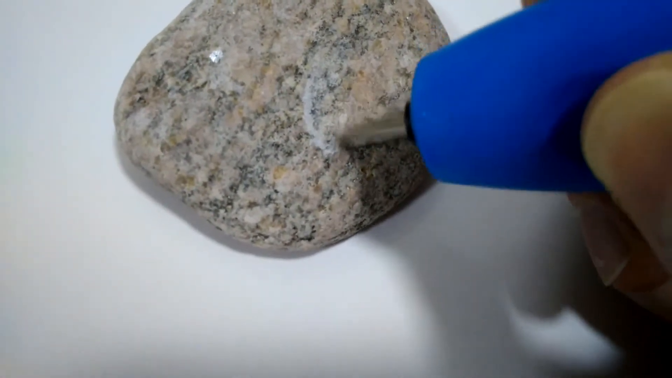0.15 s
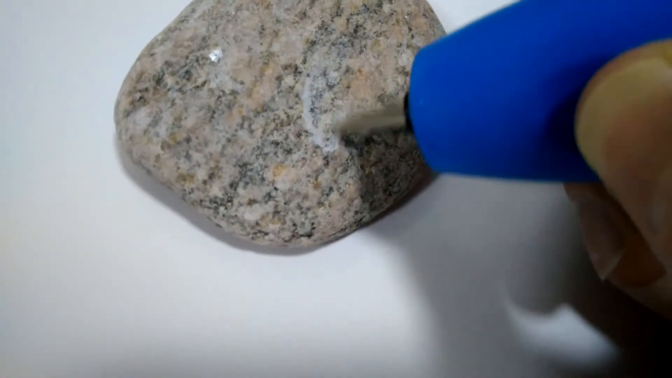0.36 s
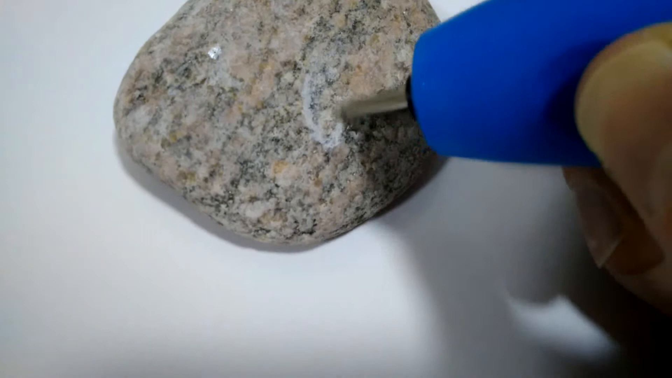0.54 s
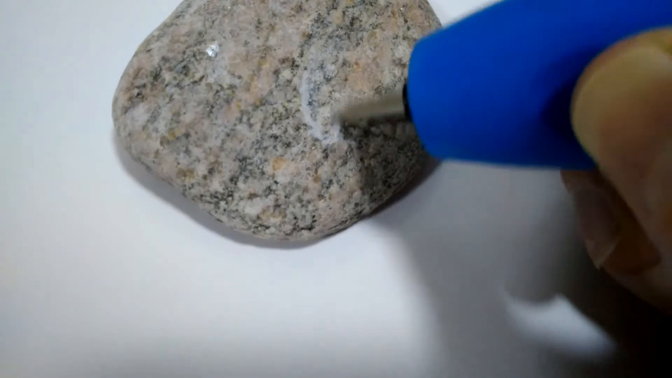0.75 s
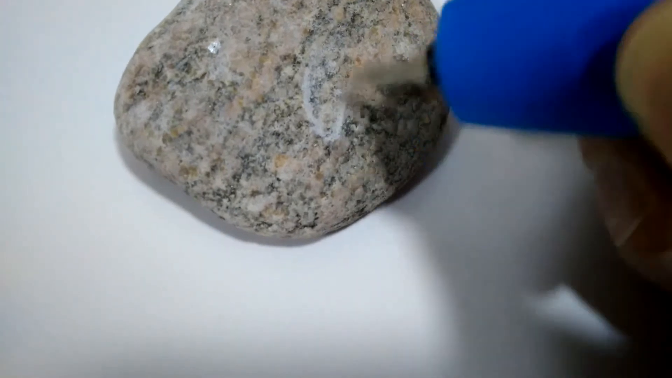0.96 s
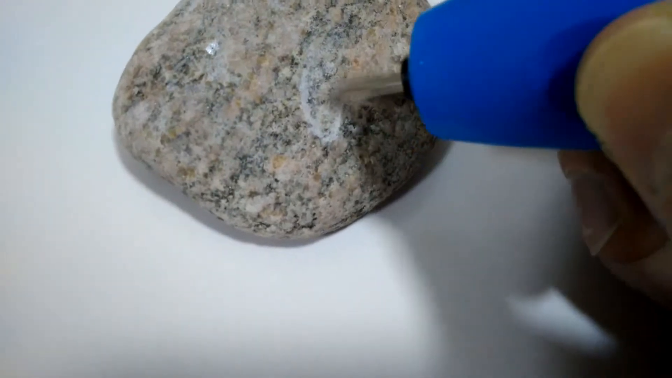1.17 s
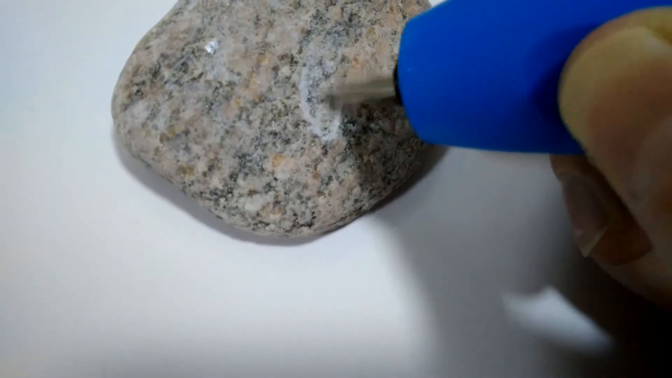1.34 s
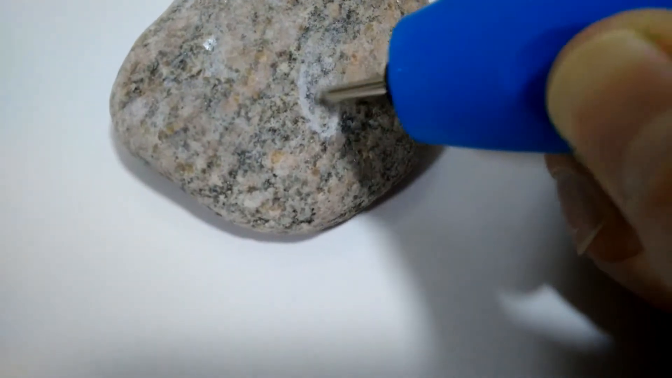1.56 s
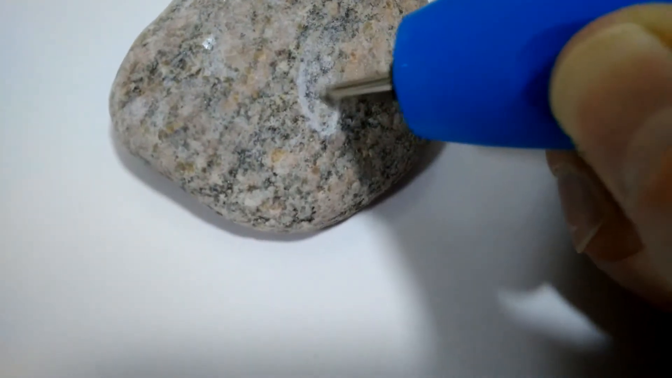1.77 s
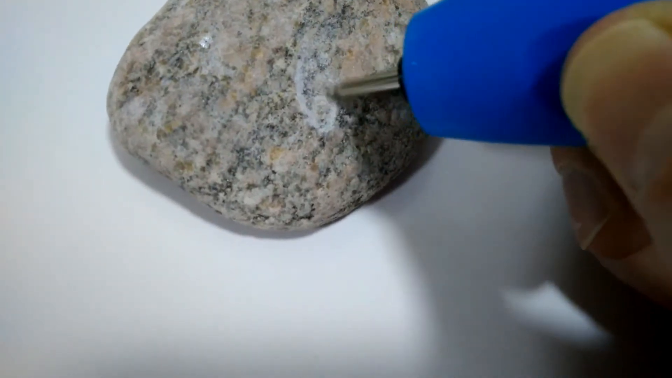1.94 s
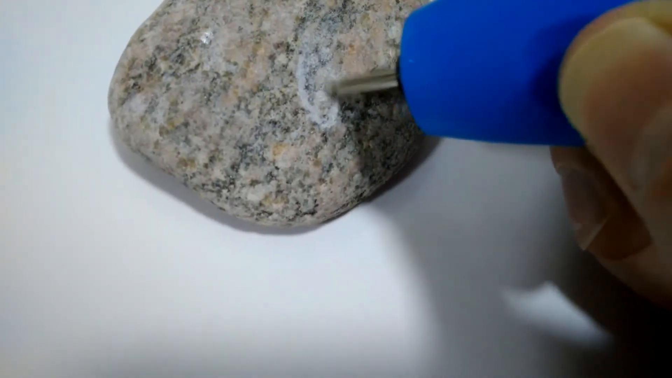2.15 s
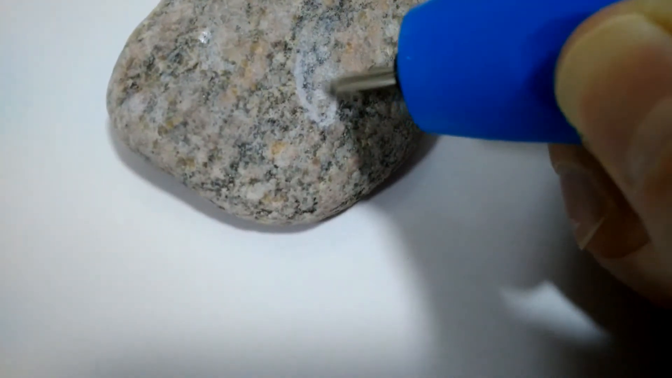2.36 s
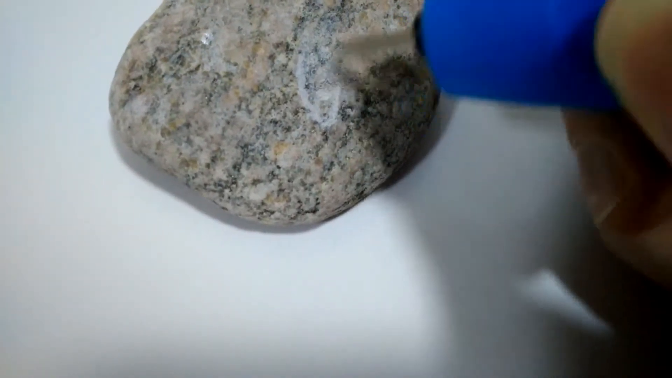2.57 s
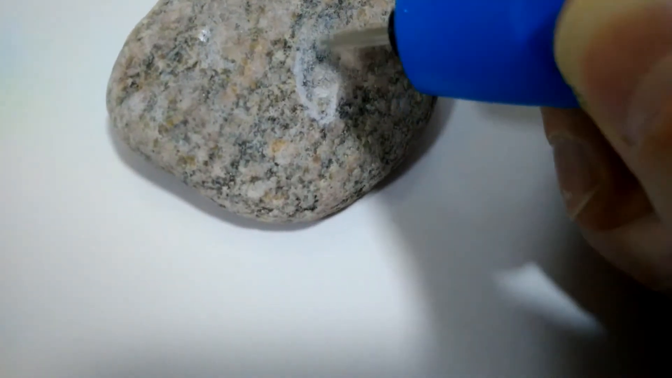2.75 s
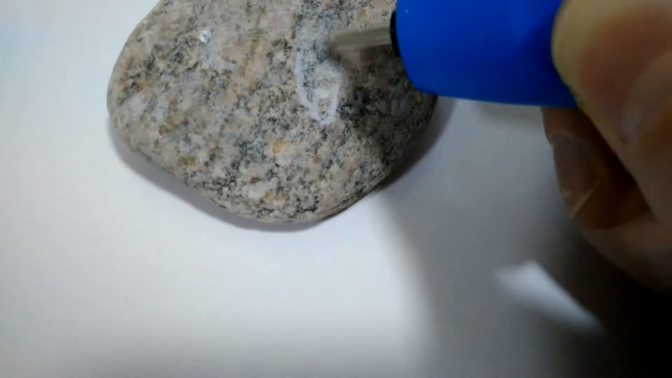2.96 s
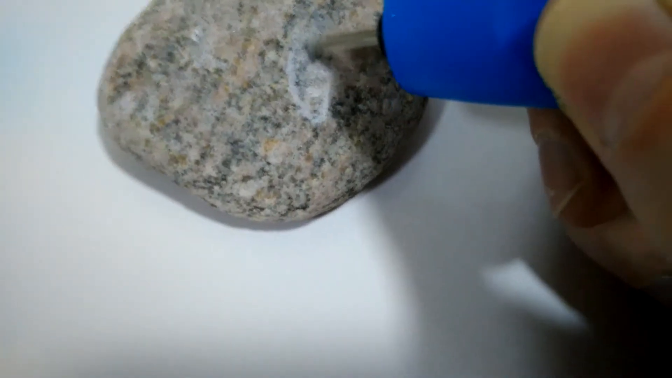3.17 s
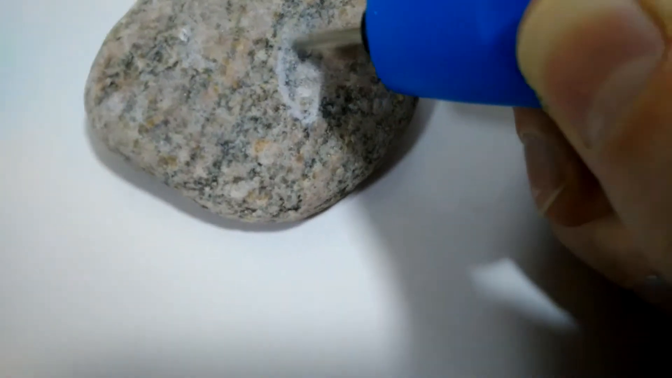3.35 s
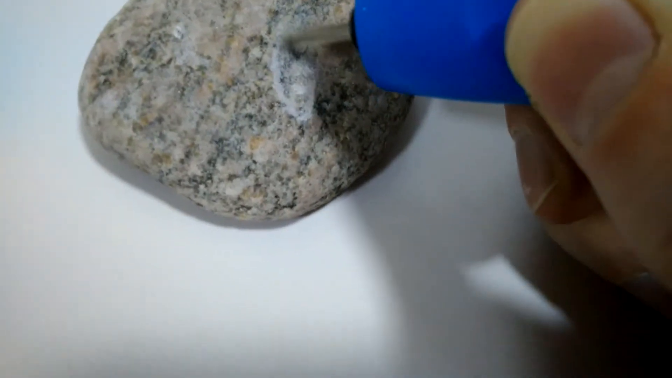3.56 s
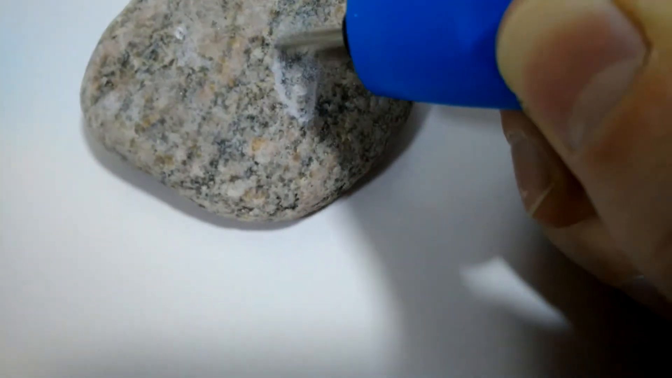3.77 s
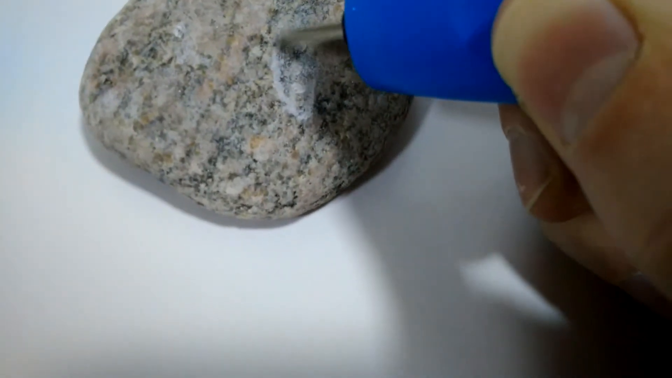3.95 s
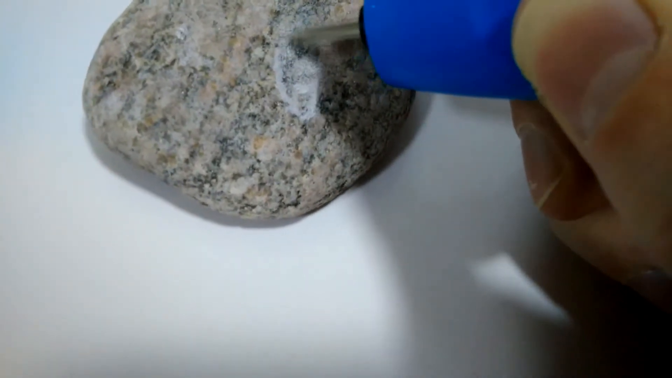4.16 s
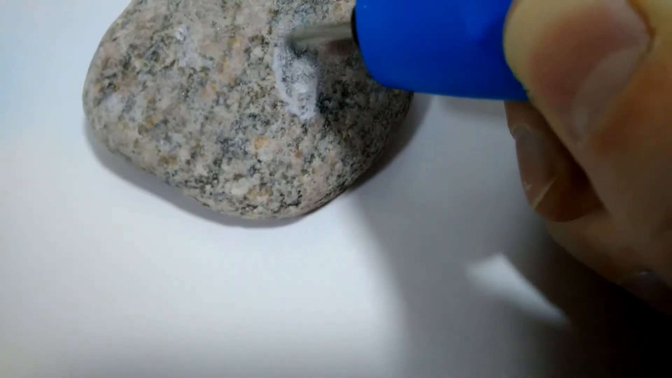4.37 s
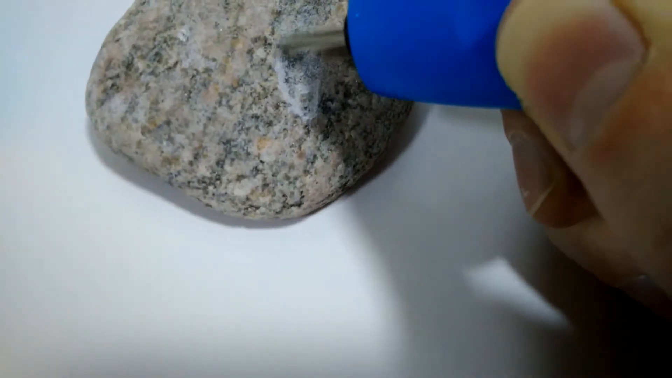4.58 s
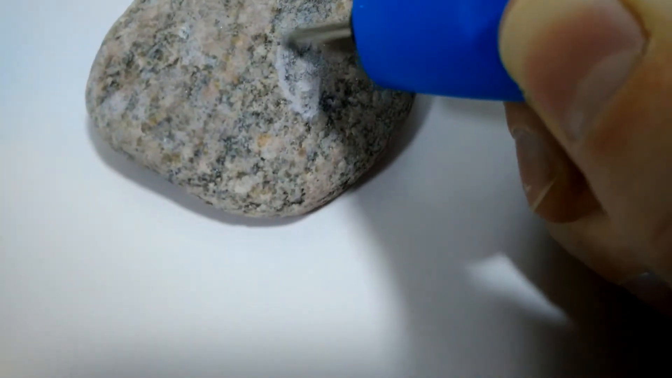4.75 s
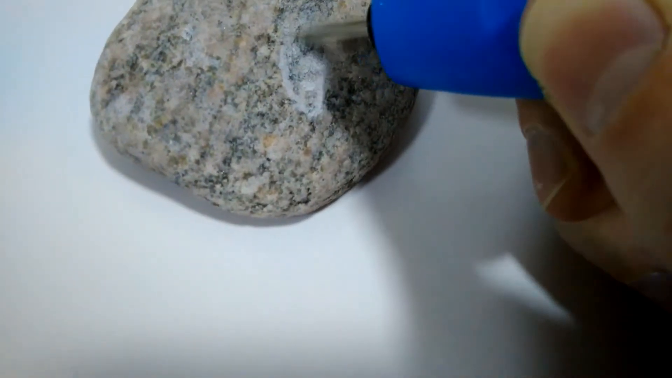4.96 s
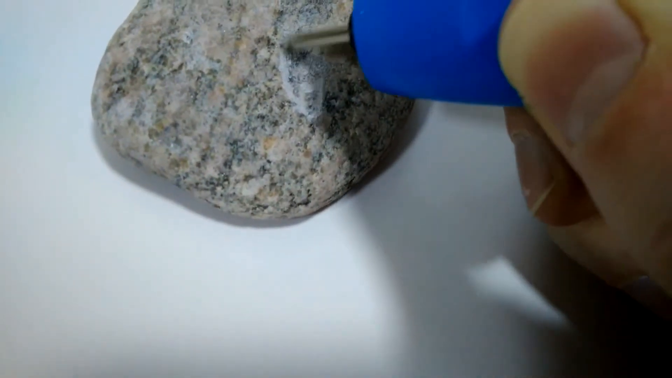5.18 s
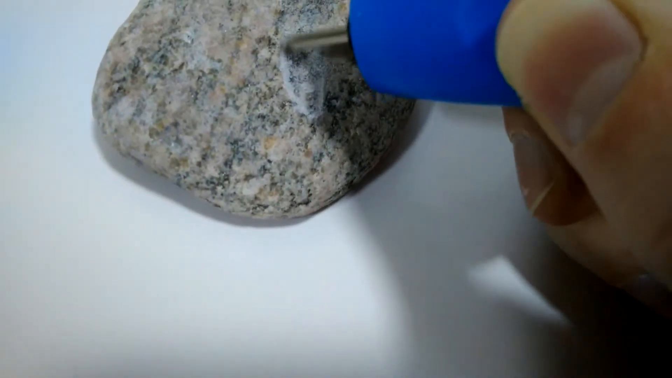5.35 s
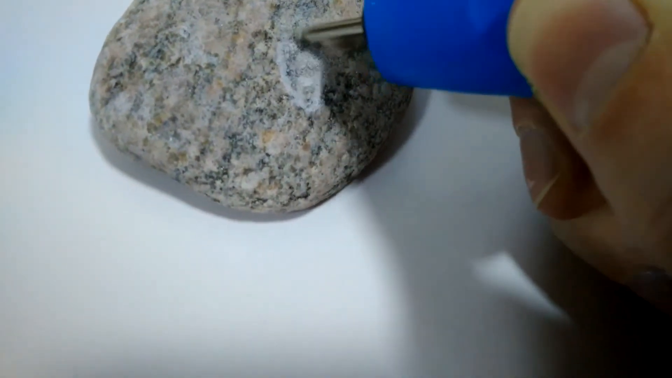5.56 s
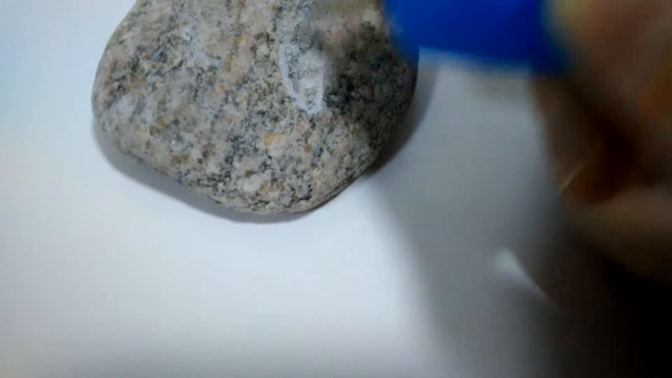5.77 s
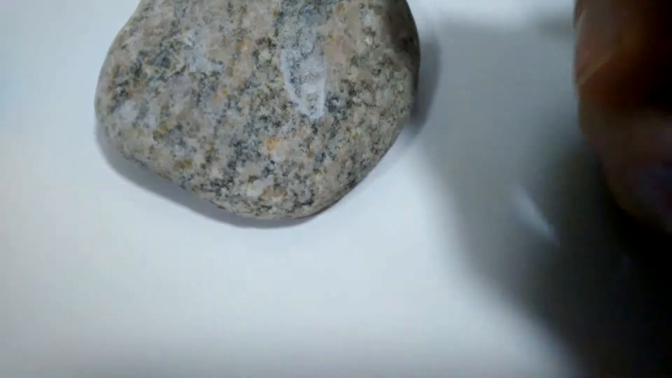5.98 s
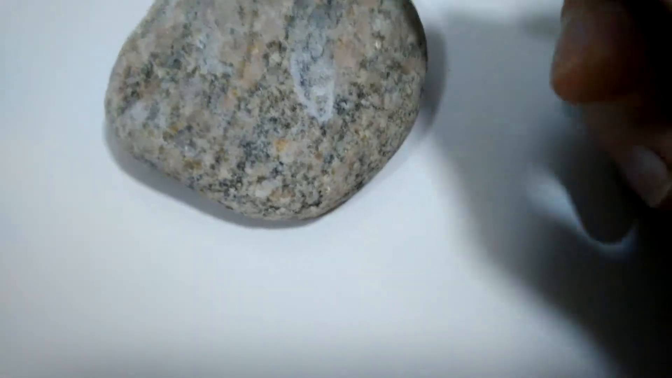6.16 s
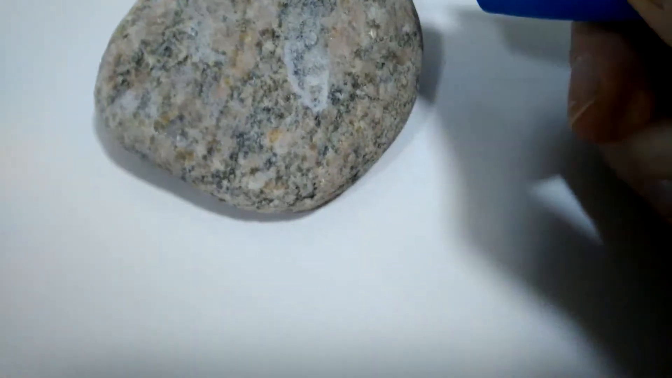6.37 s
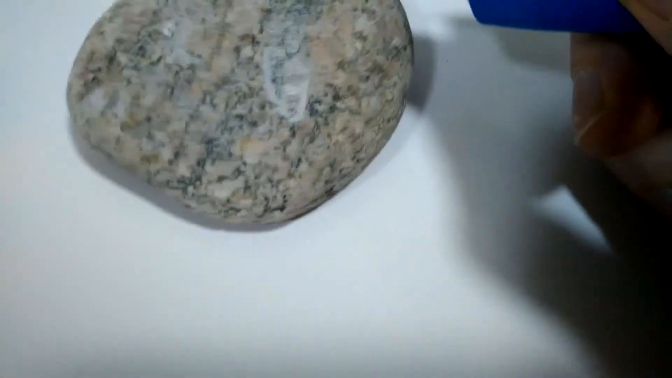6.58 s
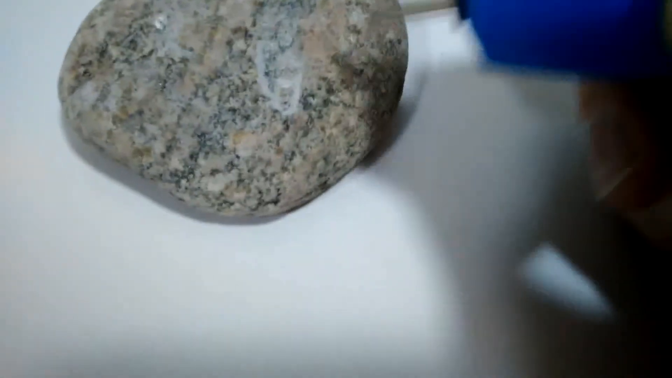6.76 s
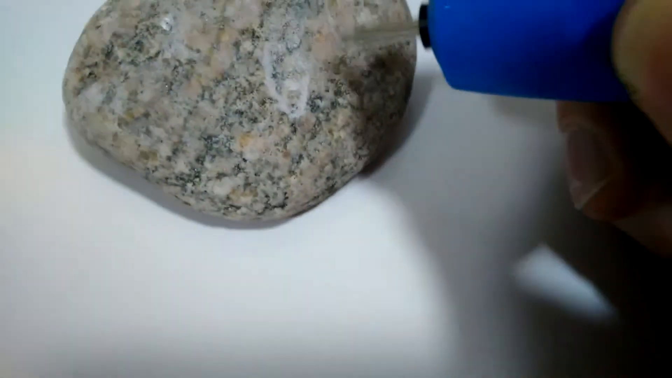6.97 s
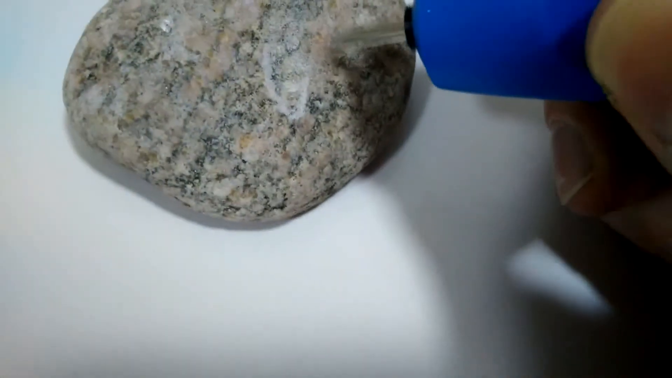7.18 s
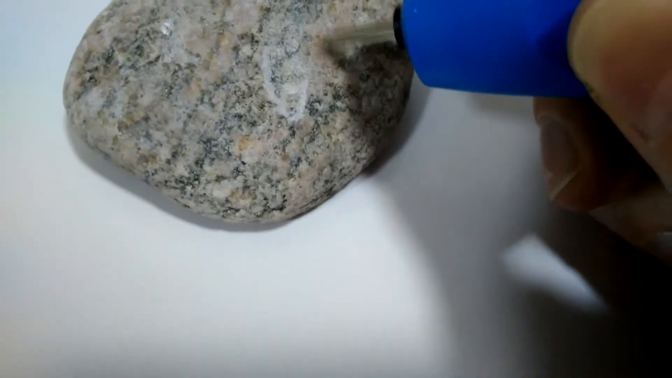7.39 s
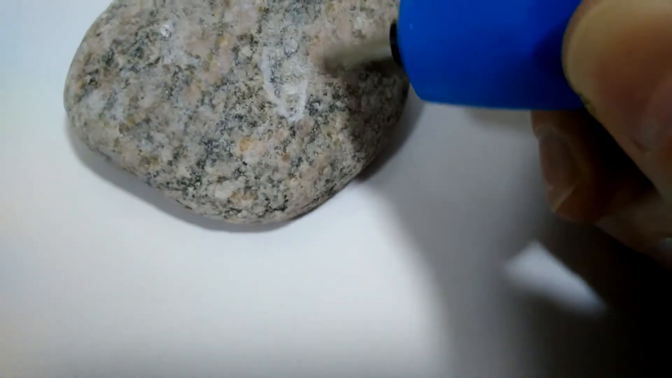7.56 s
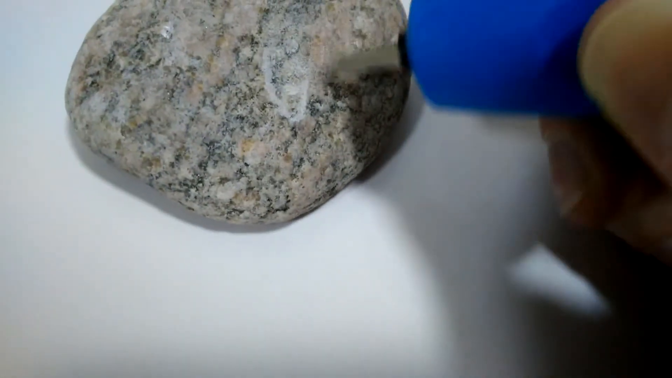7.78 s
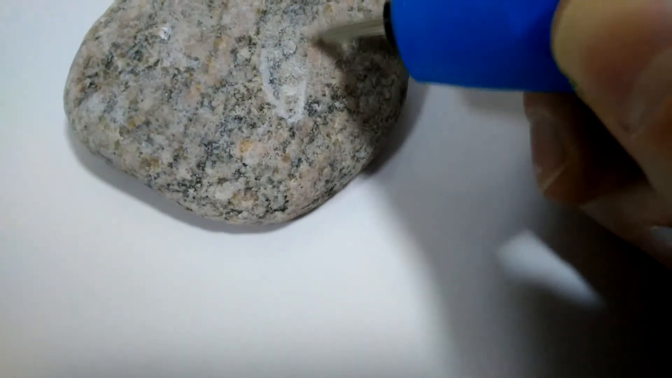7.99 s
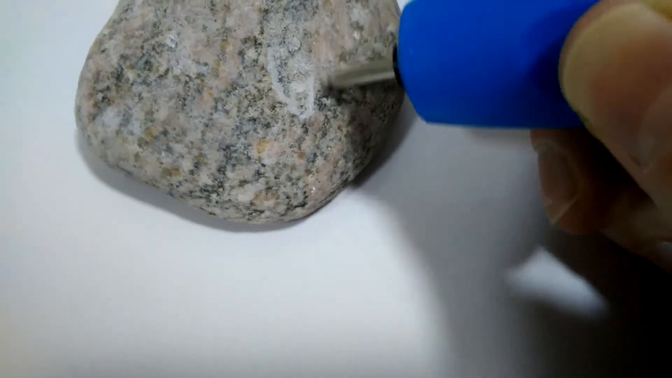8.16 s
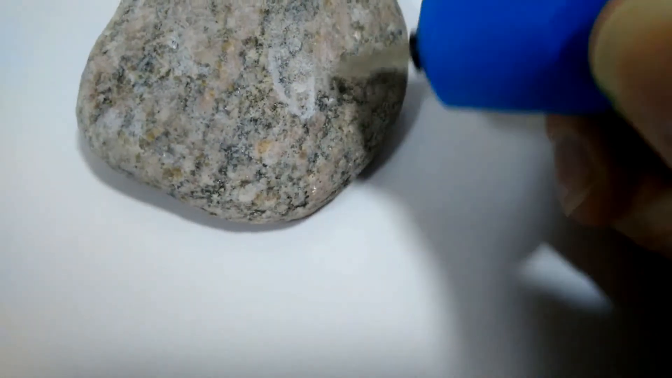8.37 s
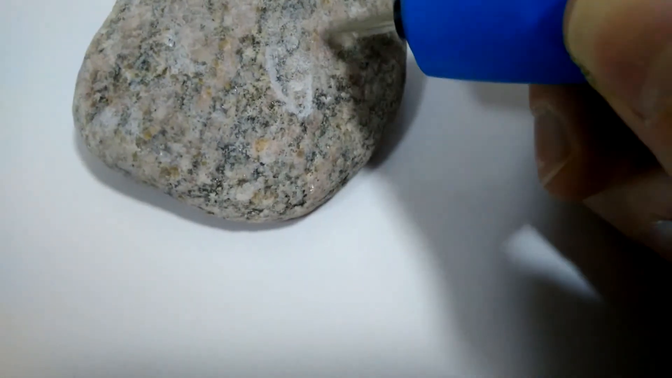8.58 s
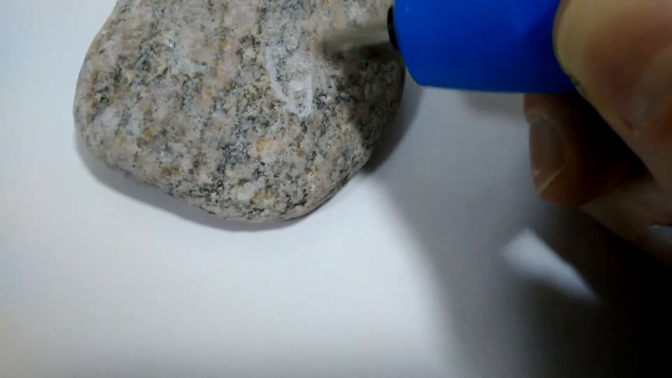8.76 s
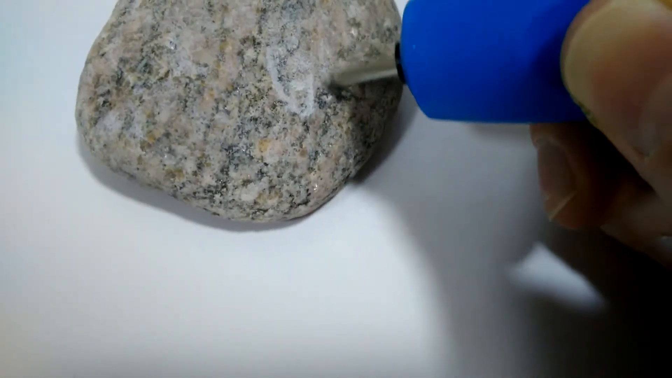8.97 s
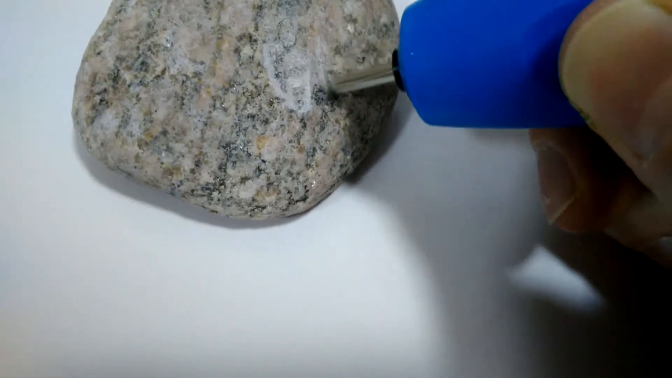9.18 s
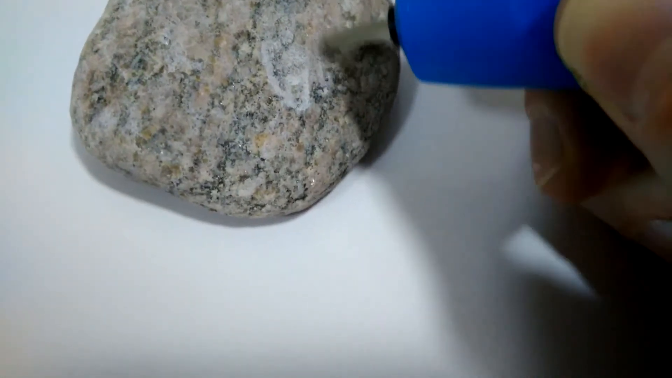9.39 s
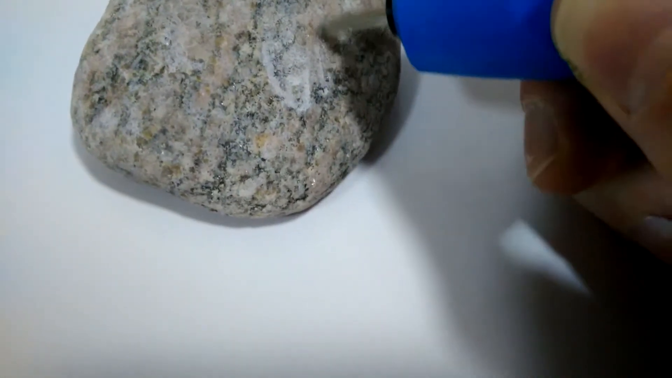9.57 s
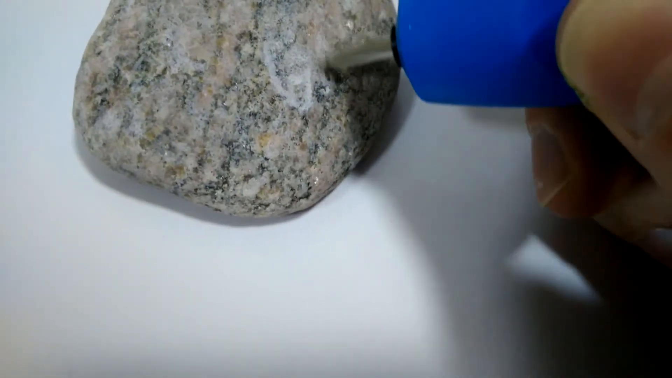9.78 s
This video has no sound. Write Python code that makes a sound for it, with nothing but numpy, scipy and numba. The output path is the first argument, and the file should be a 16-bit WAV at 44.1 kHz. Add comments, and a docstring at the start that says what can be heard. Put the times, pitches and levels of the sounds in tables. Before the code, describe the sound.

In a small, very quiet room, a battery engraving pen grinds a pebble on a table, close to a stereo microphone. It is already cutting at the start: a harsh, bright, gritty buzz with steely ringing until 0.9 s, then a faint free whir. Grinding returns from 1.3 to 2.5 s, the motor pitch wavering as pressure changes. Between 2.6 and 3 s the motor whirs and the stone rattles; another long cut runs from 3 to 5 s with a tiny break near 3.5. The motor dips at 5.15, and short strained bites follow until 5.7. Switched off at 5.8, it coasts down to near silence, with soft bumps around 6 and dry stone slides and taps from 6.3 to 6.6. It spins up at 6.75, whirs smoothly, then grinds at 7.4-7.7, briefly dips, and cuts at 8-8.3, 8.7-9.2 and from 9.5 to the end, buzzing against the table.

```python
"""Table top in a small, nearly silent room, close to a stereo microphone: a battery engraving pen grinds a pebble.
Its off-centre burr bites once a turn, crushing grains that hiss and ring the shaft, the burr and the stone.
The motor sags under load and whirs between cuts; its unbalanced rotor hums and rattles the stone on the table.
Midway it is switched off, the stone is bumped, slid and tapped, and the motor spins up again.
Everything is shaped noise, clicks, resonances and tones, and one shaft angle drives all sounds of the pen."""
import sys
import numpy as np
from scipy import signal
from scipy.fft import rfft, irfft
from scipy.io import wavfile
from scipy.ndimage import uniform_filter1d, map_coordinates
from numba import njit

SR = 44100
rng = np.random.default_rng(int(sys.argv[2]) if len(sys.argv) > 2 else 0)


def store_wav(level_fs):
    """Save 16-bit WAV to argv[1]."""
    pcm = np.round(np.clip(np.atleast_2d(level_fs), -1, 1) * 32767)
    wavfile.write(sys.argv[1], SR, pcm.T.astype(np.int16))


N = 433503
T = np.arange(N) / SR  # t/s

# Levels in the tables are relative, ahead of the trims in the functions.
# motor speed with the power on, lower the harder the hand presses: [t/s, f/Hz (turns per second)]
MOTOR_SPEED = [(0.0, 186), (0.23, 187), (0.5, 175), (0.66, 187), (0.77, 179), (0.88, 190), (0.97, 209),
               (1.28, 204), (1.48, 181), (1.76, 214), (1.88, 196), (2.0, 212), (2.15, 194), (2.42, 199),
               (2.62, 222), (2.98, 222), (3.13, 201), (3.4, 193), (3.87, 191), (3.95, 183), (4.47, 184),
               (4.8, 192), (4.94, 174), (5.07, 181), (5.15, 174), (5.42, 145), (5.6, 194), (6.9, 208),
               (7.2, 206), (7.42, 213), (7.6, 188), (7.84, 196), (8.35, 211), (8.55, 205.6), (8.69, 209),
               (8.81, 194), (9.04, 216), (9.29, 226.8), (9.35, 218), (9.5, 213), (9.83, 209)]
# button let go, so the motor coasts: [off t/s, on again t/s]
PAUSES = [(5.151, 5.26), (5.775, 6.73), (7.85, 8.005)]
# burr pressed on the stone: [touch t/s, lift t/s, attack/s, release/s, scrape level/dB,
# shaft ring over the scrape level/dB, table buzz level/dB]
CUTS = [ (-0.01, 0.889, 0.013, 0.017, -33, 8, -59.5), (1.301, 2.504, 0.007, 0.019, -33, 7, -58.5),
        (2.984, 3.532, .018, 0.02, -35, 9.5, -59.5), (3.545, 4.975, 0.0087, 0.075, -33.5, 8.5, -60.5),
        (5.301, 5.364, .04, 0.066, -45.5, 1, -65), (5.457, 5.535, 0.092, 0.034, -33.5, 0, -56.5),
        (5.565, 5.701, 0.019, 0.0091, -35, 5.5, -63.5), (7.431, 7.727, 0.031, 0.0153, -32, 4, -56),
        (7.935, 8.047, 0.002, 0.021, -42.5, 2, -65.5), (8.035, 8.298, .045, 0.012, -33, 4.5, -57.5),
        (8.689, 9.234, .015, 0.0261, -33, 5, -54.5), (9.444, 9.455, .015, 0.011, -42.5, 7, -76),
        (9.535, 9.85, 0.065, .02, -32, 5, -52.5), ]
# the burr skips over a pit: [t/s, length/s, dip level/dB]
PIT_SKIPS = [(0.019, 0.0043, -17), (0.166, 0.032, -4), (3.541, 0.0043, -11)]
# where and how the burr meets the stone: [t/s, burr ring level/dB, stone ring level/dB, # left minus right of
# shaft and strike level/dB, high sizzle level/dB, sharp strike at the height of each bite level/dB]
GRIP = [(.5, 3.5, 0, 3, -31, 0), (2.2, -0.5, -1, 4, -24, -3), (3.1, 2.5, 1.5, 8, -14, -7.5),
        (3.7, 1, 0, 1.5, -31, -3.5), (5, 1, 1.5, 4, 7, -9), (5.35, -2, -3, 0, -25, 3),
        (5.65, 1, 4.5, 5, 9, -8), (7.5, 1.5, -1, 2.5, -14.5, -2.5), (9.8, 2.5, 1, 0, -21, -0.5)]
# angle of the pen and spot on the stone retune the rings: [t/s, shaft pitch ratio, stone pitch ratio]
TUNING = [(.4, 0.98, 1.09), (2.5, 0.993, 1.133), (3.1, 0.979, .93), (3.8, 0.992, .99), (5.2, 0.99, 1.02),
          (5.33, 0.93, 1.25), (5.75, .964, 1.1), (7.55, 0.98, 1.03), (8.2, 0.96, 1.06), (9.2, 0.95, 1.04),
          (9.7, 0.94, 1.03)]
# the shaft's ring reaches the left side later as the pen moves right: [t/s, lag/s]
SHAFT_LAG = [(2.5, .000228), (3.05, .000218), (3.7, .000231), (5, .000224), (5.6, .000239), (7.5, .000244),
             (8.2, .000252), (8.75, .000246), (9.1, .000262), (9.7, .000255)]
# colour of crushed grains: [f/Hz, level/dB]
SCRAPE_COLOUR = [(80, -29.5), (280, -22), (1150, -24), (1450, -11.5), (1680, -8.5), (2150, -14), (2700, -3),
                 (3400, -3.5), (4000, -7), (5100, -1.5), (6000, -1.5), (6800, -1.5), (8000, 3.5),
                 (11000, 4), (12500, -1), (13500, -3), (16000, -1)]
# resonances of the steel shaft, before retuning: [f/Hz, width/Hz, level/dB]
SHAFT_MODES = [(9608, 777, -7), (9886, 790, -4.5), (10940, 700, -15.5), (12800, 760, -28)]
# resonances of the burr: [f/Hz, width/Hz, level/dB]
BURR_MODES = [(7630, 460, -5), (7900, 400, 4.5), (8440, 180, -8.5)]
# resonances of the stone, before retuning: [f/Hz, width/Hz, level/dB]
STONE_MODES = [(5354, 1440, 0.5), (5740, 650, -2.5), (6860, 600, -2)]
# broad sizzle above the rings: [f/Hz, width/Hz, level/dB]
SIZZLE_BANDS = [(12450, 800, 1), (14600, 14000, -2)]
# sideways bending of the pen, passed through twice: [f/Hz, width/Hz, level/dB per pass]
BENDING_MODES = [(1806, 570, 3.5), (3760, 460, 2.5)]
# motor at full speed, changing with the grip: [t/s, whir level/dB, hum level/dB, brush rub against buzz level/dB]
MOTOR_LEVELS = [(1.05, -58.5, -72, -17.5), (1.28, -55.5, -70, -14), (2.58, -41, -74, -11.5),
                (2.69, -50, -68, -20), (2.76, -44, -75, -22), (2.97, -48, -66.5, -23),
                (5.25, -46, -68, -13.5), (5.82, -58, -76, -5), (6.2, -58.5, -72, -8), (6.74, -52, -60, -5),
                (6.76, -43.5, -75, 0), (6.87, -41, -56.5, -8.5), (7.85, -42.5, -55, -6.5),
                (8.36, -42, -60, -5), (8.5, -58, -61, -23.5), (8.68, -57.5, -61, -22.5),
                (9.35, -50.5, -66, -18)]
# colour of the plastic case: [f/Hz, level/dB]
CASE_COLOUR = [(100, -40), (300, -21.5), (700, -33.5), (1200, -26.5), (1650, -12.5), (2000, -15.5),
               (2700, -8), (4000, -13.5), (5000, -5), (5700, -7.5), (6400, -9.5), (7100, -2), (7800, 1),
               (8600, -1), (9800, 5.5), (12000, -10), (15800, -0.5)]
# narrow resonances of the case: [f/Hz, width/Hz, level/dB]
CASE_MODES = [(2442, 12, 6.5), (5580, 62, -0.5)]
# clean tones of the rotor: [multiple of the shaft speed, level/dB against the whir]
ROTOR_TONES = [(2, -44), (3, -48), (4, -29), (5, -32)]
# the stone rocks and rattles on the table: [start t/s, end t/s, release/s, once-a-turn hum level/dB,
# buzz level/dB, hard clatter level/dB]
RATTLES = [(0.276, 0.335, .007, -53.5, -62, -74), (0.53, 0.597, 0.0068, -57, -60, -81),
           (0.649, 0.906, .007, -63.5, -55, -82), (0.79, 0.823, .012, -48.5, -69, -74),
           (1.298, 1.44, .007, -60, -53.5, -74.5), (1.74, 1.892, .007, -60, -54, -65),
           (1.93, 2.482, .007, -73, -52, -69.5), (2.055, 2.084, 0.01, -50, -44.5, -52.5),
           (2.429, 2.457, 0.0085, -63, -48, -46), (2.703, 2.732, .04, -38.5, -50.5, -73),
           (2.724, 2.764, 0.085, -44.5, -62, -46), (2.82, 2.829, 0.02, -41, -49.5, -49),
           (2.883, 2.968, .01, -72.5, -60, -49.5), (2.979, 3.202, .05, -67.5, -47.5, -44),
           (3.079, 3.104, 0.0092, -41.5, -46.5, -55.5), (3.368, 3.38, .007, -55, -41.5, -51),
           (5.263, 5.395, 0.0077, -63, -73.5, -86.5), (5.406, 5.455, .007, -62, -58.5, -59),
           (7.454, 7.554, 0.018, -55, -49, -51), (8.046, 8.108, 0.037, -53, -54, -54),
           (8.288, 8.304, .007, -48.5, -46, -61), (8.845, 9.09, .007, -52.5, -53, -66),
           (9.591, 9.853, 0.0082, -48.5, -49, -59)]
# colour of the table's buzz: [f/Hz, level/dB]
TABLE_COLOUR = [(60, -44.5), (150, -32.5), (245, 8.5), (320, -4.5), (430, 9), (620, 2.5), (850, -3.5),
                (1200, -13.5), (2000, -5), (4000, -49.5)]
# rings of the stone clattering hard, passed through twice: [f/Hz, width/Hz, level/dB per pass]
CLATTER_MODES = [(715, 160, 2.5), (830, 160, 5.5), (1095, 190, 2), (1400, 400, 2), (1850, 920, 1)]
# hands bump the stone and the table: [start t/s, end t/s, attack/s, release/s, level/dB]
BUMPS = [(0.03, 0.06, 0.011, 0.013, -50), (1.13, 1.48, 0.006, 0.03, -64.5), (3.03, 3.4, 0.014, 0.23, -75),
         (5.96, 6.03, 0.01, 0.021, -59), (6.06, 6.14, 0.022, 0.071, -48), (6.33, 6.355, .004, 0.0071, -53)]
# the stone slides on the table: [start t/s, end t/s, attack/s, release/s, level/dB]
SLIDES = [(6.332, 6.337, 0.0011, 0.021, -49), (6.461, 6.55, 0.018, 0.03, -46),
          (6.586, 6.596, 0.0037, 0.0046, -50)]
# single knocks of burr, stone and pen body: [t/s, level/dB]
TAPS = [(0.034, -14), (6.3355, -30.5), (6.476, -42), (6.498, -30), (6.535, -37), (6.592, -29), (6.777, -52),
        (7.9374, -21), (7.946, -36), (7.957, -21), (7.968, -36), (9.4542, -22.5)]
# colour of the hands' bumps: [f/Hz, level/dB]
HAND_COLOUR = [(20, -23), (58, 14), (130, 4), (220, -15), (500, -39), (2000, -62)]
# colour of slides and knocks: [f/Hz, level/dB]
PEBBLE_COLOUR = [(80, -23), (300, -7), (800, -15), (1800, -15.5), (4000, -12), (7000, -6.5), (10000, 5),
                 (13000, -17), (16000, -7)]
# colour of the background: [f/Hz, level/dB]
FLOOR_COLOUR = [(30, 2.5), (200, 0.5), (600, -20), (3000, -32.5), (10000, -31), (16000, -35)]
# near reflections off table and hand tilt the two sides: [f/Hz, left minus right level/dB]
SIDE_TILT = [(200, 3.5), (400, -6.5), (700, -3.5), (1300, 5), (1900, 0), (3200, 3), (5000, 3), (6300, 9),
             (8000, -0.5), (12000, 5.5), (15000, -1)]

TOP_HZ = 15800
COAST_S, SPIN_UP_S = .17, .075  # time constants of the rotor
# speed wander as a share of the speed: running free, extra in a cut as grains catch the burr, and its rate
SNAG_FREE, SNAG_LOADED, SNAG_PER_S = 0.00056, .012, 40
FRESH_DB, FRESH_S = 1.5, 0.11  # the shaft rings harder just after it touches
RING_WANDER_DB, RING_WANDER_PER_S = 0.57, 7.8  # and unevenly from crystal to crystal
RING_ON_DB, RING_ON_S = -19, 0.036  # it chatters on a little as it lifts
GRAIN_REPEAT_DB, GRAIN_JITTER_S = 1, .000018  # proud grains against loose grit, and their timing scatter
DRAG_DB = 3.5  # rasp of the whole stone against the scrape
BEND_CUT_DB, BEND_WHIR_DB = -12.5, -15.5  # bending against the scrape and against the whir
POLE_DB, HARMONIC_SCATTER_DB = 2.5, 3  # the three-pole rotor favours every third harmonic
WHIR_LAW, HUM_LAW = 1.0, 2.1  # powers of the speed share
RATTLE_ATTACK_S = 0.0032
HUM_OVER_BUZZ_DB, FREE_BUZZ_DB = -5.5, -17  # hum against buzz in a cut; buzz against hum in the air
BUMP_IN_CUT_DB = -47  # rumble of the hand against the scrape


def undb(db):
    """Decibels to gain."""
    return 10 ** (np.asarray(db) / 20)


def unit(x):
    """Scale to rms 1."""
    return x / np.sqrt(np.mean(x ** 2))


def curve(rows, axis=1):
    """One column of a table, joined by straight lines in time."""
    rows = np.asarray(rows)
    return np.interp(T, rows[:, 0], rows[:, axis])


def walk(rate):
    """Smooth chance with a spread near 1, moving at about the given rate per second."""
    k = int(SR / rate)
    return 1.2 * uniform_filter1d(np.repeat(rng.standard_normal(N // k + 1), k), k)[:N]


def envelope(start, end, attack_s, release_s):
    """Rise from the start, hold, and die away after the end."""
    rise = 1 - np.exp(-np.maximum(T - start, 0) / max(attack_s, 1e-4))
    return rise * np.exp(-np.clip((T - end) / max(release_s, 1e-4), 0, 30))


def swells(rows):
    """Summed gain of events given as (start, end, attack, release, dB)."""
    return sum(envelope(*row[:4]) * undb(row[4]) for row in rows)


def colour(x, points):
    """Minimum-phase filter through (Hz, dB) points, made by folding the cepstrum."""
    hz, db = np.transpose(points)
    grid = np.linspace(1, SR / 2, 2049)
    cepstrum = irfft(np.log(undb(np.interp(np.log(grid), np.log(hz), db))))
    half = len(cepstrum) // 2
    fold = np.r_[1, np.full(half - 1, 2), np.zeros(half)]
    response = irfft(np.exp(rfft(cepstrum * fold)))
    return signal.oaconvolve(x, response)[:N]


@njit
def resonate(x, hz, width):
    """Band-pass with gain 1 at a centre that may move (state-variable filter)."""
    y, b, l = np.empty(len(x)), 0., 0.
    for i in range(len(x)):
        g = np.tan(np.pi * hz[i] / SR)
        k = np.pi * width / SR * (g + 1 / g)
        v = (b + g * (x[i] + 1e-18 - l)) / (1 + g * (g + k))
        b, l, y[i] = 2 * v - b, l + 2 * g * v, k * v
    return y


def ring(x, modes, tuning=1):
    """Parallel resonances, alternating in sign as along a rod."""
    total = 0
    for k, (hz, width, db) in enumerate(modes):
        centre = np.minimum(hz * tuning * np.ones(N), .45 * SR)
        total = total + (-1) ** k * undb(db) * resonate(x, centre, float(width))
    return total


def clicks(times, sizes):
    """Impulses placed between samples with a short windowed sinc."""
    at = np.ravel(times)[:, None] * SR
    index = at.astype(int) + np.arange(-5, 7)
    shape = np.sinc(index - at) * np.cos(np.pi * (index - at) / 12) ** 2
    inside = (index >= 0) & (index < N)
    return np.bincount(index[inside], (shape * np.ravel(sizes)[:, None])[inside], N)


def space(x, near_db, room_db, pan_db, near_s, shift_s, lag_s=.00023, room_t60=0.2, lopsided_db=5,
          near_from_hz=600, size=4096):
    """Direct sound, left later by the lag; scatter off table and hand shifts as the hand moves; a small room."""
    t, sides = T[:2 * size], []
    padded = np.pad(x, (size, 2 * size))
    blocks = np.lib.stride_tricks.sliding_window_view(padded, 2 * size)[::size]
    spectra = rfft(blocks * np.hanning(2 * size), 4 * size)
    high_pass = signal.butter(1, near_from_hz, "high", fs=SR)
    for sign in (1, -1):  # left, right
        # the scatter drifts from block to block
        near = rng.standard_normal((len(blocks), size // 2))
        near = signal.lfilter([1], [1, -np.exp(-size / SR / shift_s)], near, axis=0)
        near = signal.lfilter(*high_pass, near * (np.exp(-t / near_s) * (t > .0004))[:size // 2])
        near /= np.linalg.norm(near, axis=1, keepdims=True)
        room = rng.standard_normal(len(t)) * undb(-60 * t / room_t60) * (t > .006)
        room *= undb(room_db - 0.82 * sign) / np.linalg.norm(room)
        response = np.tile(room, (len(blocks), 1))
        response[:, :size // 2] += undb(near_db - lopsided_db * sign) * near
        response[:, int(lag_s * SR) * (sign > 0)] += 1
        # reflections ripple the spectrum finely but leave its broad colour alone
        transfer = rfft(response, 4 * size)
        transfer /= np.sqrt(uniform_filter1d(np.abs(transfer) ** 2, 600 * size // SR))
        # overlap-add
        parts = np.split(irfft(spectra * transfer), 4, axis=1)
        heard = sum(np.pad(part.ravel(), (k * size, 0))[size:size + N] for k, part in enumerate(parts))
        sides.append(undb(sign * pan_db / 2) * heard)
    return np.array(sides)


def spin():
    """The share of full speed: the rotor coasts down in each pause and spins up after it."""
    share = np.ones(N)
    for off, on in PAUSES:
        lost = 1 - np.exp(-np.clip(T - off, 0, on - off) / COAST_S)
        share *= 1 - lost * np.exp(-np.maximum(T - on, 0) / SPIN_UP_S)
    return share


def contact():
    """The cuts as three gains: scrape, ring of the shaft and buzz of the table."""
    scrape = shaft = buzz = 0
    for touch, lift, attack_s, release_s, scrape_db, ring_db, buzz_db in CUTS:
        press = envelope(touch, lift, attack_s, release_s)
        lingering = np.maximum(press, undb(RING_ON_DB) * envelope(touch, lift, attack_s, RING_ON_S))
        fresh_db = FRESH_DB * np.exp(-np.maximum(T - touch, 0) / FRESH_S)
        scrape = scrape + press * undb(scrape_db)
        shaft = shaft + lingering * undb(scrape_db + ring_db + fresh_db)
        buzz = buzz + press * undb(buzz_db)
    skip_db = sum(db * np.exp(-np.minimum(((T - at) / length) ** 2, 20)) for at, length, db in PIT_SKIPS)
    skips = undb(skip_db)
    return scrape * skips, shaft * skips * undb(RING_WANDER_DB * walk(RING_WANDER_PER_S)), buzz


def bites(turns, width, scatter_db, slip, drag_db):
    """Contact force: the burr's high side bites once a turn, each time differently, over a light steady drag."""
    turn = turns.astype(int)
    size, shift = rng.standard_normal((N // 50, 2)).T
    # width and slip are in turns
    bite = np.exp(-.5 * ((turns - turn - .5 - slip * shift[turn]) / width) ** 2)
    return bite * undb(scatter_db * size[turn]) + undb(drag_db)


def grit(spread_db):
    """Abrasive grains breaking stone: dense noise of quickly changing level."""
    return unit(rng.standard_normal(N) * undb(spread_db * walk(2500)))


def proud_grains(turns, spread_db, wear, count=22):
    """The burr's tallest grains strike at the same angles each turn; their shares change as the stone gives way."""
    angles = (np.arange(count) + rng.random(count)) / count
    at = np.arange(int(turns[-1]))[:, None] + angles
    depth, late = rng.standard_normal((2, count, N // 150))[:, :, :len(at)].transpose(0, 2, 1)
    depth = unit(signal.lfilter([1], [1, np.clip(wear, .01, 1) - 1], depth, axis=0))
    times = np.interp(at, turns, T) + GRAIN_JITTER_S * late
    return unit(clicks(times, depth * undb(spread_db * np.abs(depth))))


def chips(turns, spread_db):
    """Once a turn a flake snaps off: mostly tiny, now and then a sharp tick."""
    where, size = rng.random((int(turns[-1]), 2)).T
    times = np.interp(np.arange(len(size)) + .3 + .25 * where, turns, T)
    return unit(clicks(times, undb(spread_db * size ** 3)))


def bending(x):
    """The pen's sideways ring pushes air towards one microphone and away from the other: opposite signs."""
    return unit(ring(ring(x, BENDING_MODES), BENDING_MODES)) * np.array([[1], [-1]])


def rasp(turns, pressure):
    """The whole stone rasps on between the bites, with separate grains on each side."""
    sides = []
    for _ in range(2):
        grains = grit(spread_db=4) + 1.2 * proud_grains(turns, spread_db=1, wear=.1)
        sides.append(unit(colour(grains, SCRAPE_COLOUR)))
    force = unit(pressure * bites(turns, width=.16, scatter_db=2.5, slip=.05, drag_db=-1))
    return np.array(sides) * force * undb(DRAG_DB)


def grinding(turns, gain, shaft_gain):
    """Each bite carries a sharp strike at its height and crushes grains, which hiss and ring stone, burr and
    shaft."""
    pressure = undb(.5 * walk(28))
    grains = grit(spread_db=3) + undb(GRAIN_REPEAT_DB) * proud_grains(turns, spread_db=2.2, wear=.1)
    crush = unit(grains * bites(turns, width=.07, scatter_db=2.1, slip=.02, drag_db=-10))
    crush = unit(pressure * np.tanh((crush + .2 * chips(turns, spread_db=14)) / 5))
    strike = np.tanh(grains / 2) * bites(turns, width=.035, scatter_db=1.5, slip=.015, drag_db=-40)
    strike = unit(colour(strike, SCRAPE_COLOUR)) * undb(curve(GRIP, axis=5))
    force = pressure * bites(turns, width=.085, scatter_db=1.3, slip=.02, drag_db=-20)
    # the contact damps the steel, which evens out the strongest bites
    shaft = unit(ring(grit(spread_db=1.2) * force, SHAFT_MODES, curve(TUNING)))
    shaft = unit(np.tanh(shaft / 3)) * shaft_gain * undb(2.0)
    burr = unit(ring(grit(spread_db=-1.5) * (force + 0.18), BURR_MODES)) * undb(curve(GRIP))
    stone = unit(ring(crush, STONE_MODES, curve(TUNING, axis=2))) * undb(curve(GRIP, axis=2))
    sizzle = unit(ring(crush, SIZZLE_BANDS)) * undb(curve(GRIP, axis=4))
    scrape = unit(colour(crush, SCRAPE_COLOUR)) * undb(5.0) + stone + sizzle + burr
    drag = rasp(turns, pressure)
    left, right = space(shaft + strike * gain, near_db=-5, room_db=-11, pan_db=0, near_s=0.002,
                        shift_s=.5, lag_s=0, lopsided_db=3)
    left = map_coordinates(left, [(T - curve(SHAFT_LAG)) * SR])
    tip = np.array([left, right]) * undb(curve(GRIP, axis=3) * np.array([[.5], [-.5]]))
    body = space(scrape * gain, near_db=7, room_db=-3, pan_db=-1.5, near_s=0.0035, shift_s=.4)
    return body + tip + (drag + bending(crush) * undb(BEND_CUT_DB)) * gain


def brushes(turns, count=72, size=2048):
    """The brushes scrape the same way on every turn: a stack of harmonics, every third one stronger."""
    order = np.arange(count)
    level_db = POLE_DB * (order % 3 == 0) + HARMONIC_SCATTER_DB * rng.standard_normal(count)
    strength = undb(level_db) * (order > 0)
    one_turn = irfft(strength * np.exp(-2j * np.pi * np.cumsum(.7 * rng.random(count))), size)
    return unit(np.interp(turns % 1, np.arange(size) / size, one_turn))


def motor(turns, hz, share):
    """The brushes buzz and rub inside the plastic case and shake the pen; the rotor and the case sing."""
    stack = brushes(turns)
    # a slow rotor rubs more than it buzzes
    rub = undb(curve(MOTOR_LEVELS, axis=3) + 60 * np.clip(1 - hz / 205, 0, .33))
    drive = (stack + rub * grit(spread_db=3)) / np.hypot(1, rub)
    whir = unit(colour(drive, CASE_COLOUR))
    tones = 0
    for order, db in ROTOR_TONES:
        tone = np.sin(2 * np.pi * (round(order) * turns + rng.random()))
        tones = tones + undb(db + 2 * walk(11)) * tone
    gain = undb(curve(MOTOR_LEVELS) + 1.5) * share ** WHIR_LAW
    singing = (tones + ring(stack, CASE_MODES)) * np.clip(hz / 205, 0, 1) ** 4
    body = space(whir * gain, near_db=1, room_db=-9, pan_db=1.5, near_s=0.0036, shift_s=0.6, lag_s=0)
    return body + (singing + bending(drive) * undb(BEND_WHIR_DB)) * gain


def clattering(turns, slip, scatter_db, scuff_db):
    """The stone lands a little differently on every turn and scuffs the table as it does."""
    late, size = rng.standard_normal((int(turns[-1]), 2)).T
    times = np.interp(np.arange(len(size)) + .5 + slip * late, turns, T)
    landings = unit(clicks(times, undb(scatter_db * size)))
    scuff = unit(rng.standard_normal(N) * bites(turns, width=.12, scatter_db=2.5, slip=.03, drag_db=-12))
    return unit(ring(ring(landings + undb(scuff_db) * scuff, CLATTER_MODES), CLATTER_MODES))


def shaking(turns, share, load, cut_buzz):
    """The unbalanced rotor hums; pressed on the stone, it knocks it against the table once a turn."""
    free = undb(curve(MOTOR_LEVELS, axis=2)) * share ** HUM_LAW
    hum_power = free ** 2 + (cut_buzz * undb(HUM_OVER_BUZZ_DB)) ** 2
    buzz_power = (free * undb(FREE_BUZZ_DB)) ** 2 + cut_buzz ** 2
    clatter_power = 0
    for start, end, release_s, hum_db, buzz_db, clatter_db in RATTLES:
        rocking = envelope(start, end, RATTLE_ATTACK_S, release_s)
        clatter_power = clatter_power + (rocking * undb(clatter_db)) ** 2
        hum_power = hum_power + (rocking * undb(hum_db)) ** 2
        buzz_power = buzz_power + (rocking * undb(buzz_db)) ** 2
    at = np.arange(int(turns[-1])) + .5
    late, size = rng.standard_normal((len(at), 2)).T
    knocks = unit(clicks(np.interp(at, turns, T) + .00007 * late, undb(2 * size)))
    # light contact chatters, firm contact knocks evenly
    chatter_db = np.clip(-9 - .6 * (10 * np.log10(buzz_power) + 48), -12, -1)
    chatter = undb(chatter_db) * np.sqrt(load)
    buzz = (knocks + chatter * rng.standard_normal(N)) / np.hypot(1, chatter)
    buzz = unit(colour(buzz, TABLE_COLOUR) * undb(2.8 * walk(30)))
    hum = unit(np.sin(2 * np.pi * turns) * undb(3 * walk(60) * (chatter + .3)))
    clatter = clattering(turns, slip=.02, scatter_db=3, scuff_db=-3)
    table = buzz * np.sqrt(buzz_power) * undb(3.5) + clatter * np.sqrt(clatter_power) * undb(-2.0)
    spread = space(table, near_db=-6, room_db=-8.5, pan_db=6.0, near_s=0.0091, shift_s=1.0)
    return hum * np.sqrt(hum_power) * undb(-2.5) + spread


def handling(scrape):
    """Soft bumps and a rumble of the hand in each cut, a dry slide of the stone and small knocks."""
    rumble = np.array([unit(colour(rng.standard_normal(N), HAND_COLOUR)) for _ in range(3)])
    # one rumble shared by both sides, one of its own for each
    bumps = (.5 * rumble[0] + rumble[1:]) * undb([[3], [-5]])
    bumps = bumps * (swells(BUMPS) + undb(BUMP_IN_CUT_DB) * scrape)
    slide = unit(colour(grit(spread_db=6.0) * undb(1.9 * walk(90)), PEBBLE_COLOUR))
    slide = slide * swells(SLIDES) * undb(-5.0)
    times, peak_db = np.transpose(TAPS)
    taps = colour(clicks(times, undb(peak_db + 12)), PEBBLE_COLOUR)
    return bumps + space(slide + taps, near_db=5, room_db=-8.5, pan_db=0, near_s=0.0018, shift_s=1)


def background():
    """The nearly silent room: faint coloured noise, independent on each side."""
    floor = np.array([unit(colour(rng.standard_normal(N), FLOOR_COLOUR)) for _ in range(2)])
    return undb(-81.5) * floor


def scene():
    """One shaft angle drives all sounds of the pen; hands and room are added."""
    scrape, shaft, buzz = contact()
    load, share = np.clip(scrape / undb(-34), 0, 1), spin()
    wander = (SNAG_FREE + SNAG_LOADED * load) * walk(SNAG_PER_S)
    hz = curve(MOTOR_SPEED) * share * (1 + wander)
    turns = np.cumsum(hz) / SR
    pen = grinding(turns, scrape, shaft) + motor(turns, hz, share) + shaking(turns, share, load, buzz)
    return pen + handling(scrape) + background()


def record(dry):
    """The stereo microphone: the two sides are tilted against each other, and the top is cut steeply."""
    sides = []
    for x, sign in zip(dry, (1, -1)):
        sides.append(colour(x, [(hz, sign * db / 2) for hz, db in SIDE_TILT]))
    return signal.sosfilt(signal.ellip(10, .2, 80, TOP_HZ, fs=SR, output="sos"), sides)


dry = scene()
out = record(dry)
store_wav(out)
```